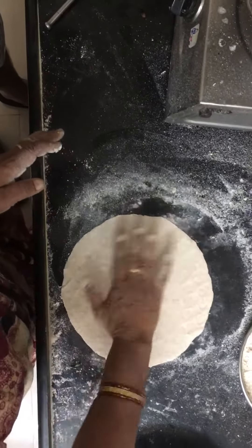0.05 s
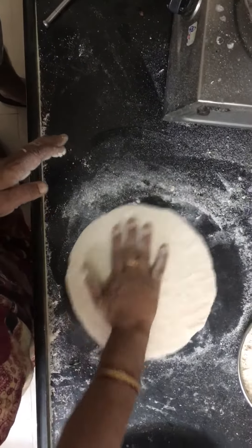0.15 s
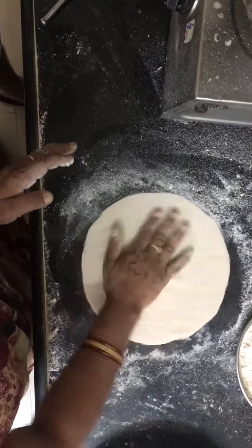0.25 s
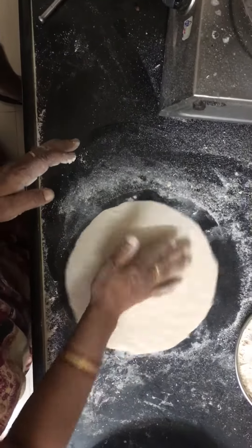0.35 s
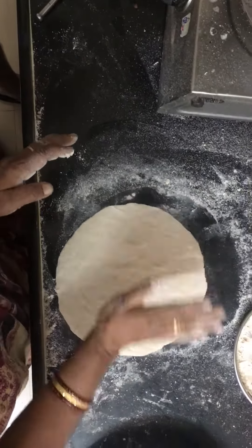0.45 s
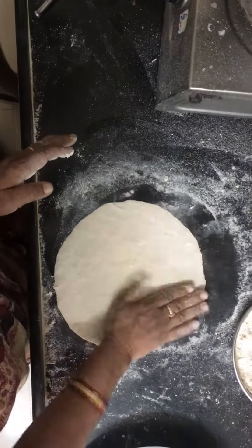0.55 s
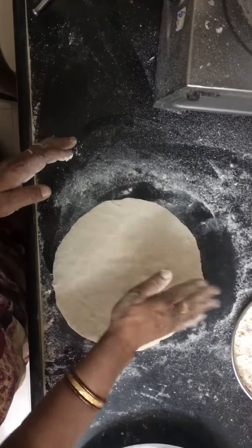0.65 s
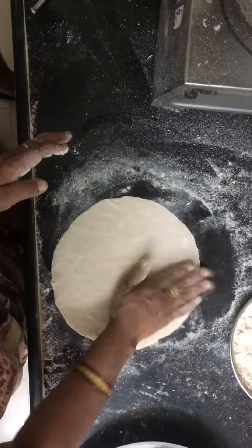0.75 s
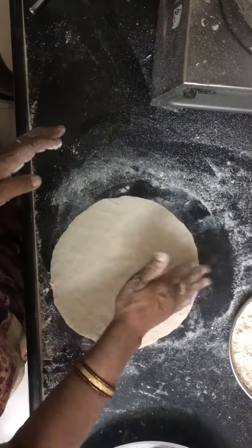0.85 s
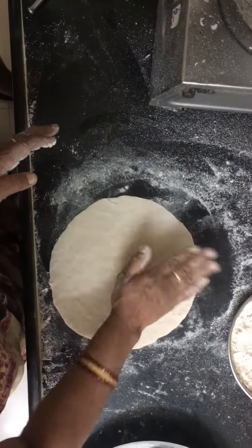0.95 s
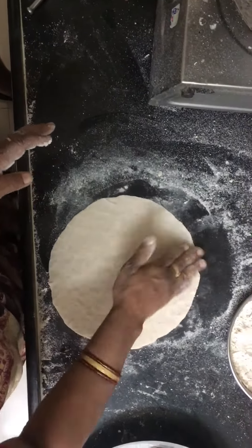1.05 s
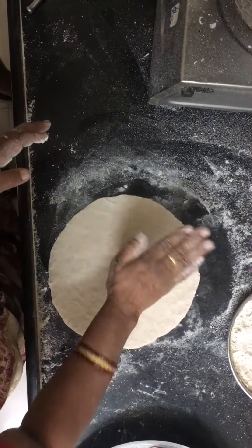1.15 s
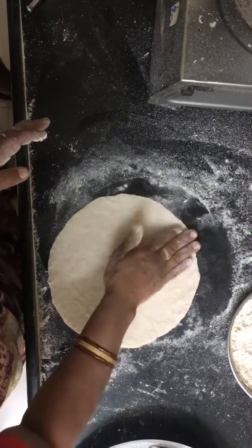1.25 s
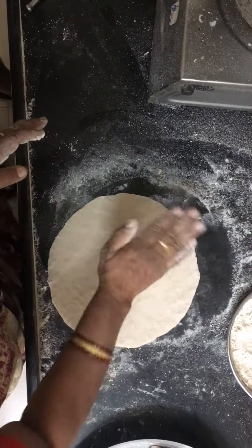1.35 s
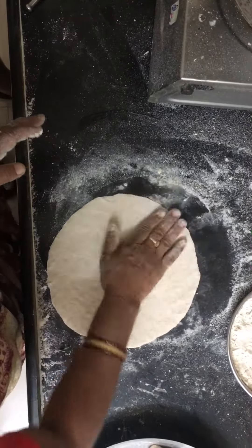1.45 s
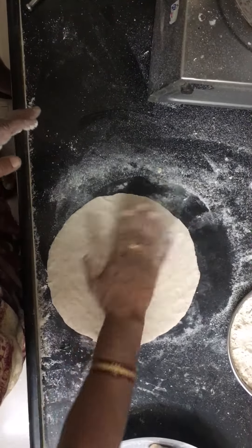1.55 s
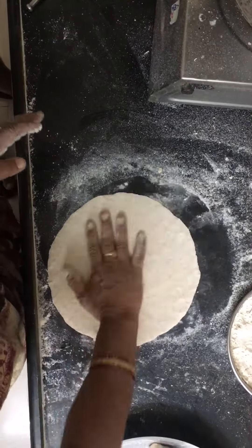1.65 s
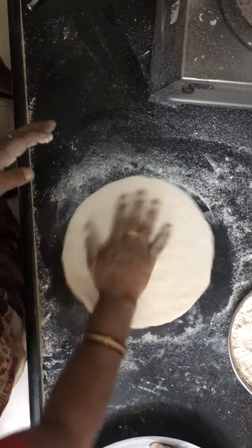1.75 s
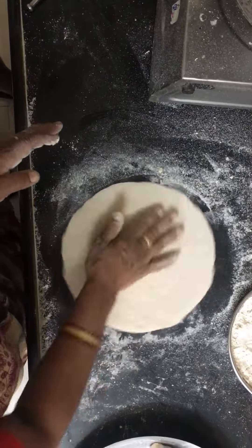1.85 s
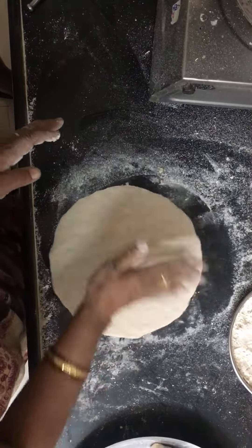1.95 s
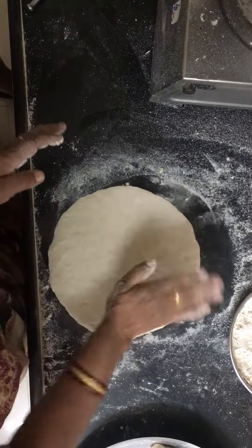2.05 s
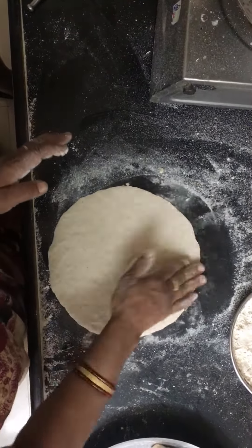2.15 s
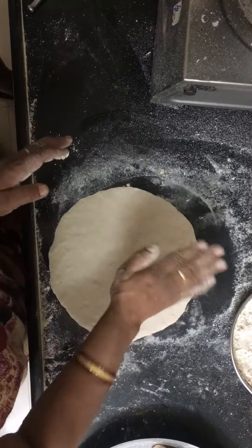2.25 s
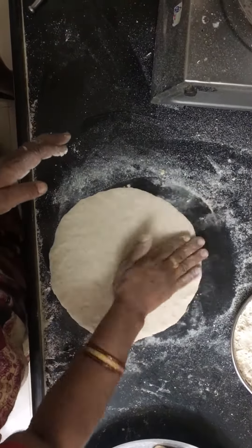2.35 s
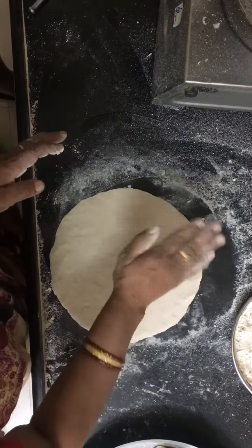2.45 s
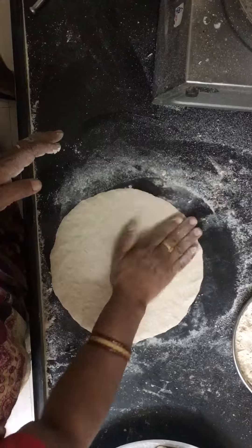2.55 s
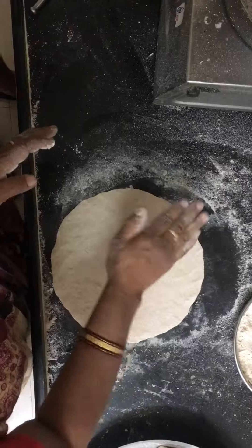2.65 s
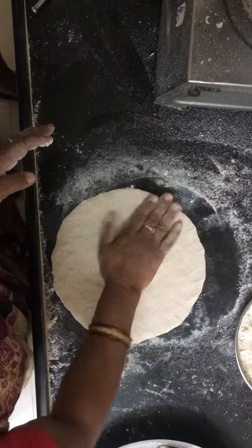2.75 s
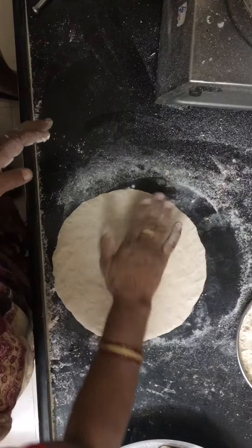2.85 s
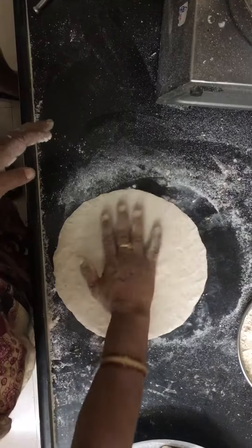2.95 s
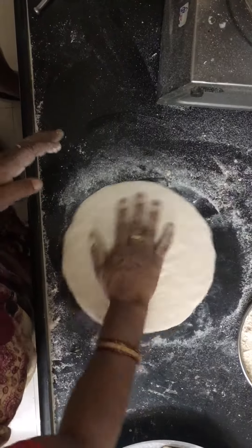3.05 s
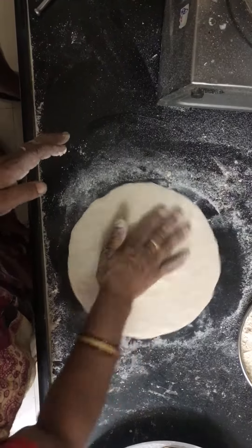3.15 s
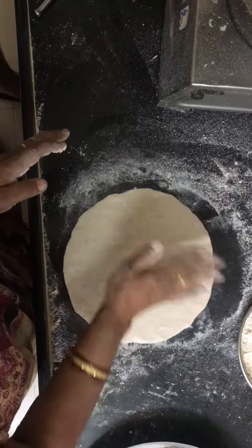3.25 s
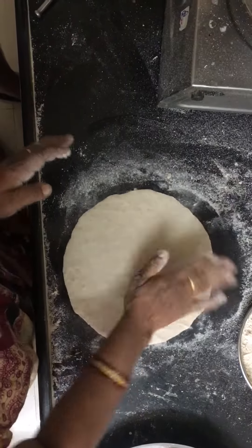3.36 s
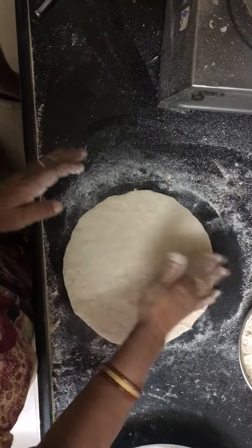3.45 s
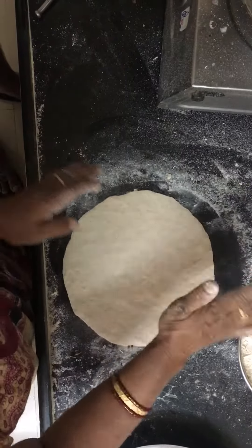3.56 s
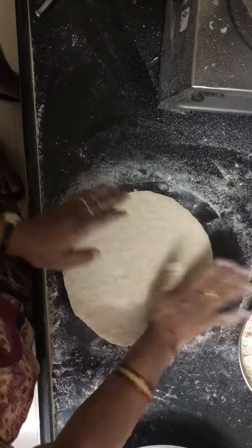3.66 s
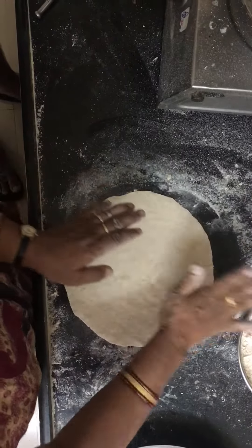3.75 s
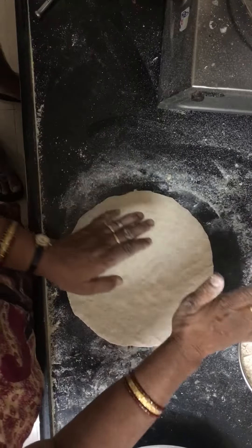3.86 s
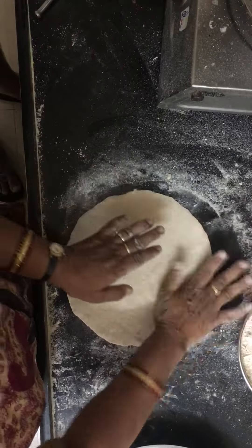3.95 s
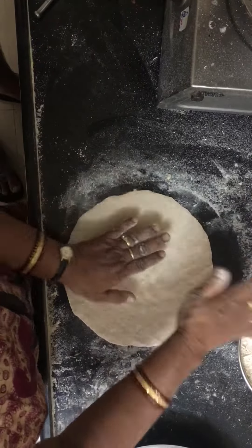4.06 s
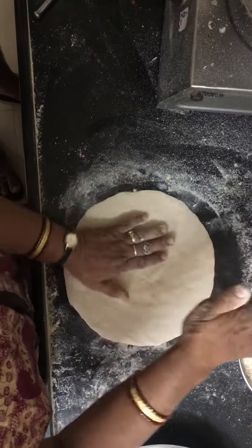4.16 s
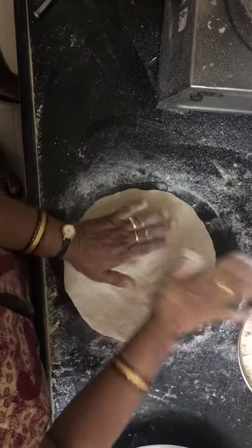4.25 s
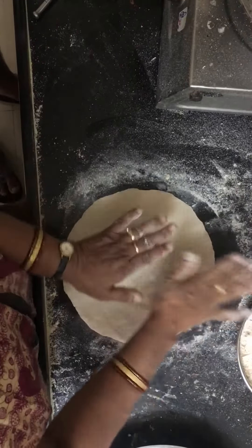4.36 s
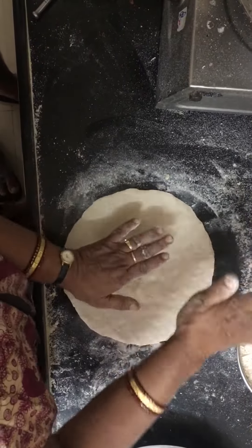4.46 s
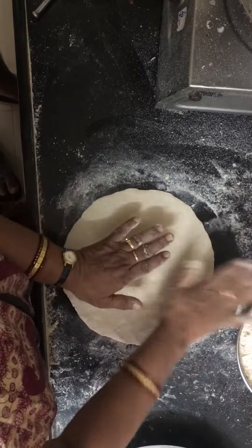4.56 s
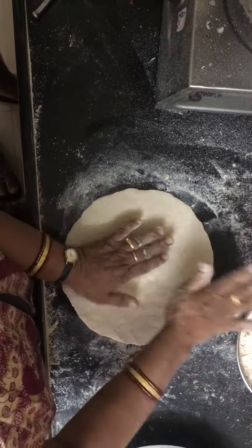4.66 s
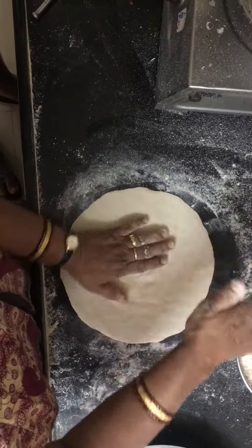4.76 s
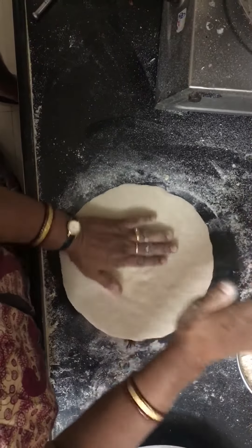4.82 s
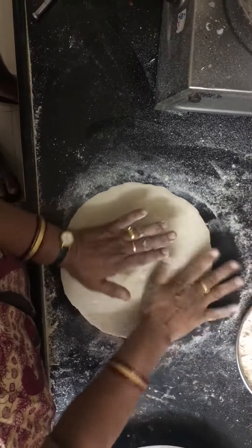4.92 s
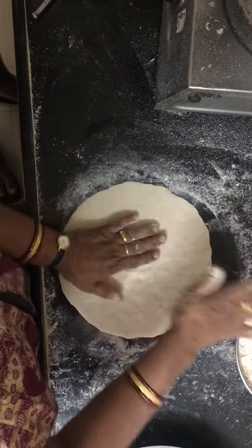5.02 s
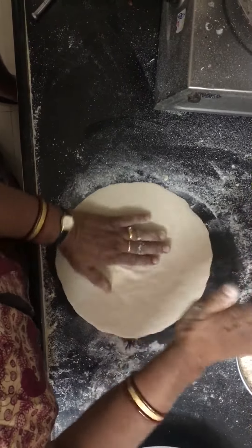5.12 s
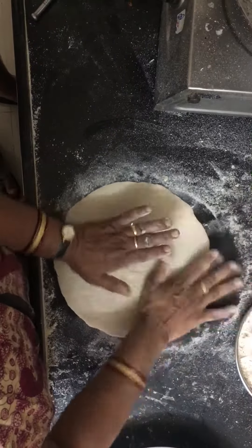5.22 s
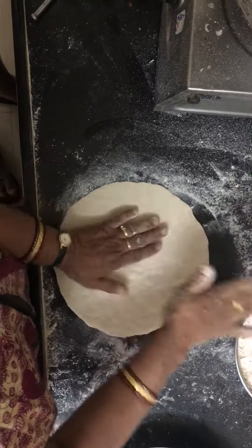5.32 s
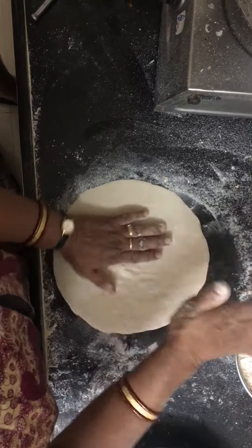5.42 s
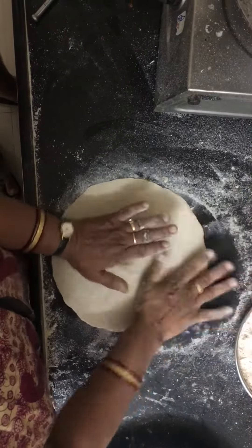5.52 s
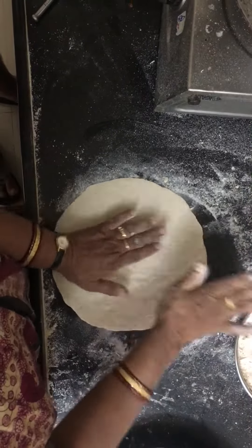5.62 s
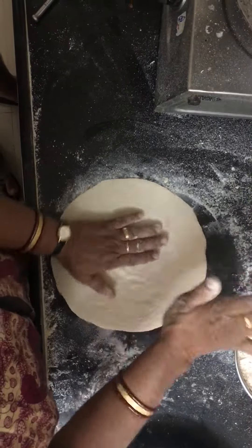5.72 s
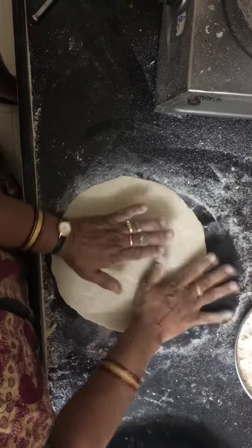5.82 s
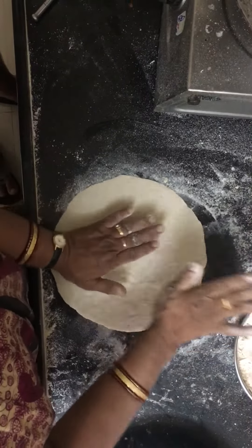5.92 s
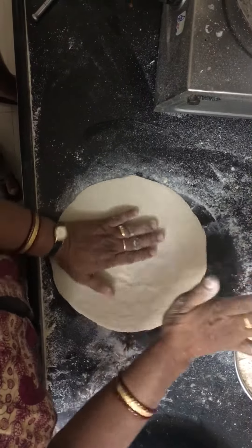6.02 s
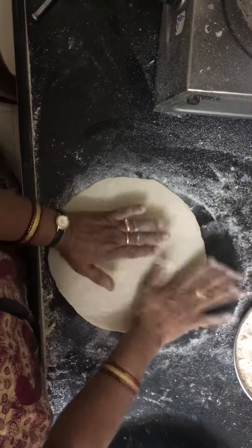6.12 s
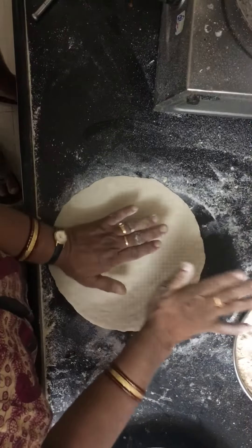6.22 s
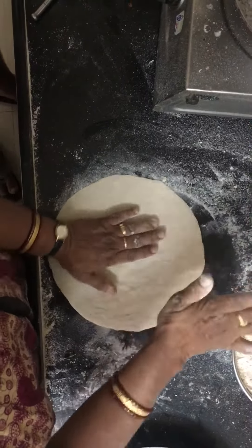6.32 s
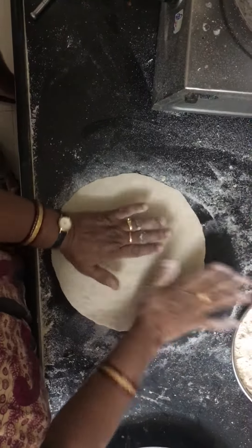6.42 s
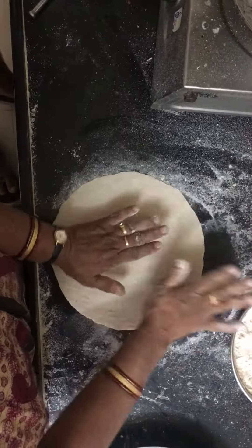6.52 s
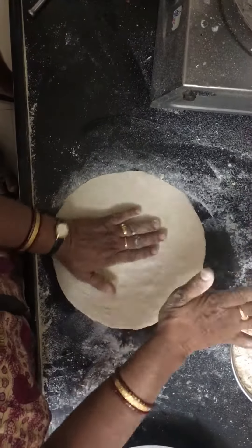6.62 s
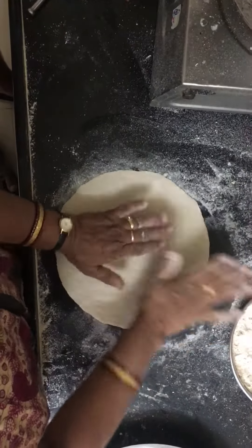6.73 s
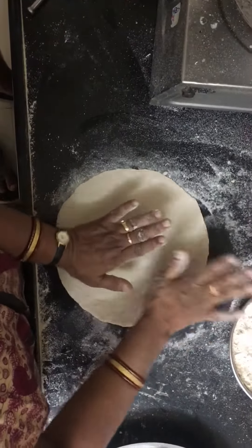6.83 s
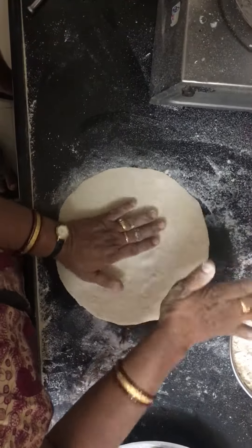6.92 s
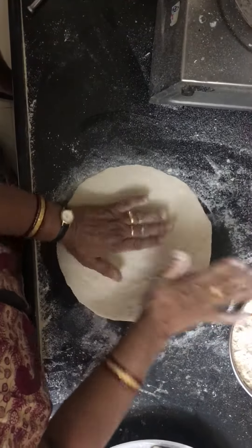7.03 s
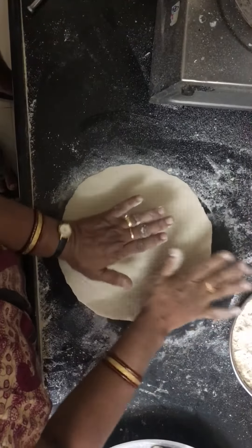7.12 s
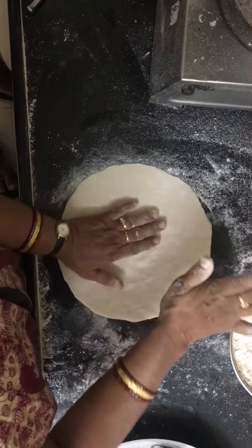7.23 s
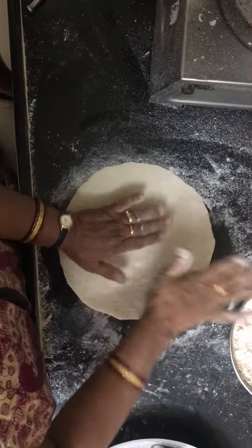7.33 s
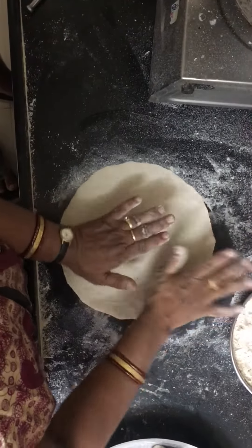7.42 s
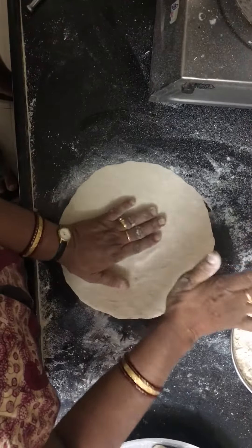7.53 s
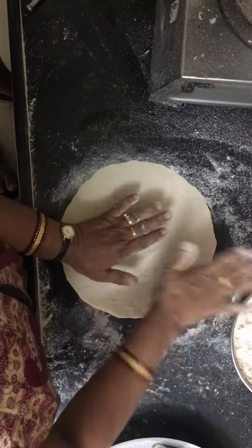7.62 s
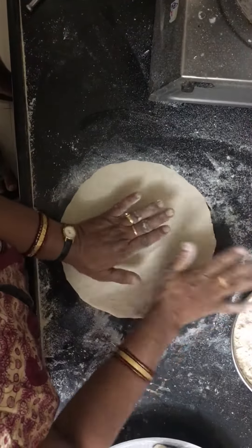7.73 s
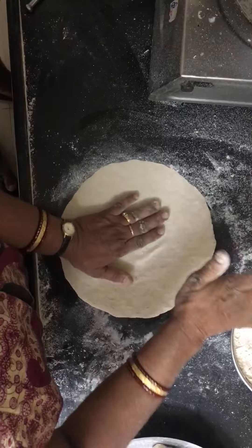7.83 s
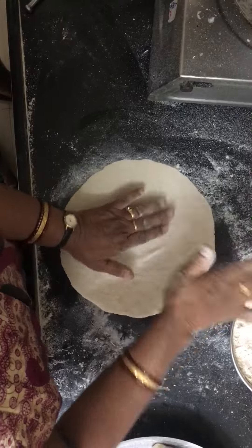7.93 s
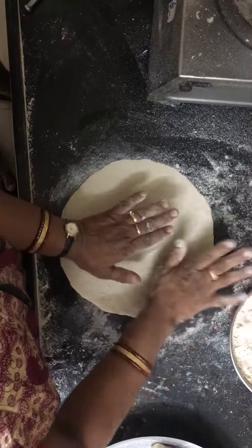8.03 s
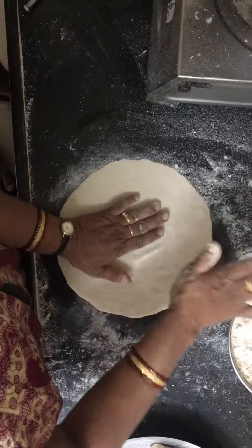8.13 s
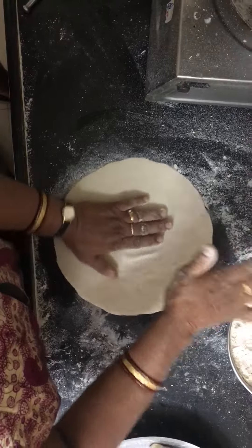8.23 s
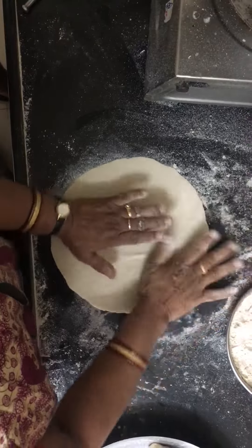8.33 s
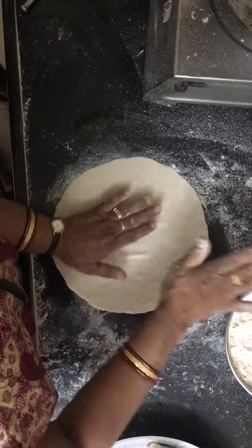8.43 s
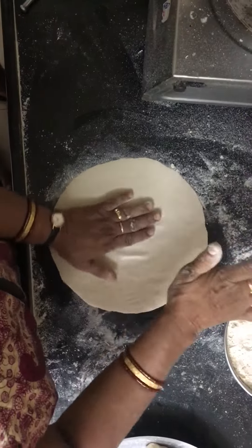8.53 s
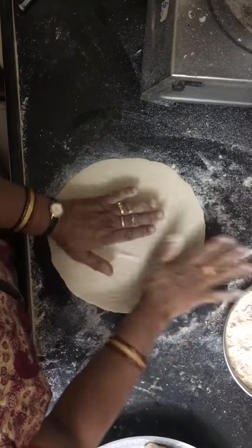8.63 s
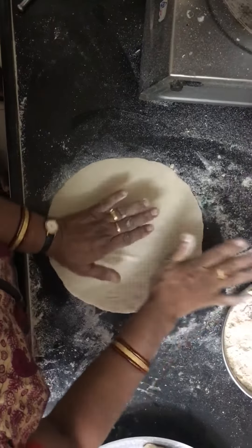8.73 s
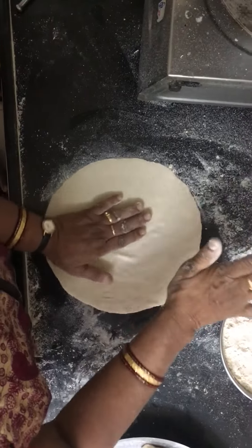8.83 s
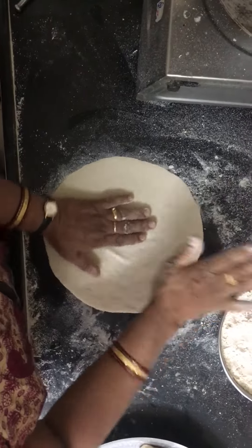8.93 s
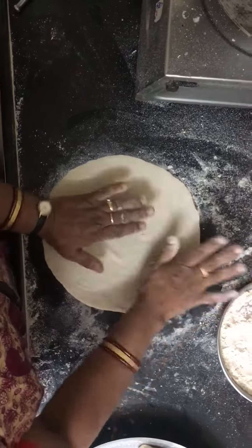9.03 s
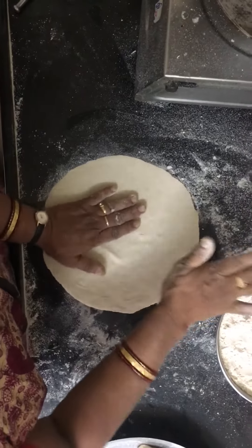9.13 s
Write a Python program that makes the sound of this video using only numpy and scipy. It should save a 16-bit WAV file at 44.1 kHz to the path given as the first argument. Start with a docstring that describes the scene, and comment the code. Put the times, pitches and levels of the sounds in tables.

```python
"""A hand slaps a round of dough flat on a floured stone counter in a small hard kitchen.
Each slap is a grainy splat coloured by trapped pockets of air, plus ringing modes of counter and room.
At first one hand pats and turns the dough, and flour hisses as shaped noise; then the other hand rests
on the dough and nudges it round after most slaps. Fingers click on the tacky surface.
A mains appliance hums behind it all as wavering sines over room noise."""
import sys
import numpy as np
from scipy import signal
from scipy.fft import rfft, irfft
from scipy.io import wavfile
from scipy.ndimage import uniform_filter1d

SR = 44100
rng = np.random.default_rng(int(sys.argv[2]) if len(sys.argv) > 2 else 0)


def store_pcm(level_fs):
    """Save levels as 16-bit WAV."""
    pcm = np.round(np.clip(level_fs, -1, 1) * 32767).astype(np.int16)
    wavfile.write(sys.argv[1], SR, np.atleast_2d(pcm).T)


N = 404838

# Hum lines of the appliance. Each row: pitch in Hz, middle level in dB rms.
HUM = [(50, -54), (100, -49), (260, -59), (350, -58), (598, -62)]
# Colour of the room noise. Each row: frequency in Hz, relative density in dB.
ROOM_NOISE = [(20, -41), (45, -7), (70, -1), (125, 8), (150, -5.5), (180, -10.5), (320, -13), (480, -17),
              (800, -14.5), (1500, -19.5), (2500, -24.5), (5000, -36), (9000, -45.5), (16000, -53.5)]

# Turns of the dough by one hand. Each row: start in s, length before it stops in s, relative hiss in dB.
TURNS = [(0.162, 0.26, -38.5), (1.709, 0.24, -38), (3.041, 0.19, -39.5)]
# Colour of freely sliding flour. Each row: frequency in Hz, relative level in dB.
FLOUR = [(400, -15), (1200, 3), (2100, 10.5), (3200, 5), (5000, 1), (7000, -1.5), (9300, -3), (10400, -5.5),
         (12500, -2.5), (16000, -10)]
# Hiss while the resting hand presses the dough down. Each row: frequency in Hz, relative level in dB.
PRESSED_FLOUR = [(400, -8), (1200, -4), (2100, 8.5), (3200, 4.5), (5000, -0.5), (7000, -1.5), (9300, -0.5),
                 (10400, -5.5), (12500, -3), (16000, -13)]
# Slaps that no nudge follows. Each entry: row of SLAPS, counted from 0.
UNNUDGED = [11, 13, 23]
# Fingers gripping the dough for a turn or peeling off it.
# Each row: start in s, relative body level in dB, relative treble level in dB.
TOUCHES = [(0.1648, -17.5, -37), (1.713, -18, -41), (3.0408, -24, -43), (6.937, -22, -36.5),
           (7.248, -29, -41), (7.5563, -23, -36.5), (8.16, -28, -41.5), (8.5145, -29, -46)]

# Reverberation of the kitchen. Each row: frequency in Hz, t60 in s.
KITCHEN = [(200, 0.27), (700, 0.42), (1800, 0.45), (3200, 0.35), (5000, 0.36), (8000, 0.27), (13000, 0.22)]
# Standing waves that stand out of the reverberation. Each row: pitch in Hz, relative level in dB.
STANDING_WAVES = [(555, -45.5), (634, -47.5), (926, -48), (969, -55.5), (1116, -49), (1254, -48.5),
                  (1503, -59), (1621, -54), (1769, -50)]
# Reflections from the nearest surfaces. Each row: delay in s, gain as a factor.
ECHOES = [(.0014, 0.1), (.0025, 0.14), (.0036, .15), (.0078, 0.27)]
# Colour of the direct crack against its reverberation. Each row: frequency in Hz, relative level in dB.
CRACK = [(300, 3), (700, -5), (1500, 1), (3000, 1), (6000, 1.5), (14000, 0)]

# Deep modes of counter and kitchen. Each row: pitch in Hz, relative level in dB, nominal t60 in s, arrival in s.
BOOM = [(53.1, -28.5, 0.98, 0.0069), (89.4, -1.5, 0.72, 0.0013), (123, -11.5, 0.25, 0.01214),
        (145, -10, 0.15, 0.0128), (185.5, -24.5, 0.52, 0.0029), (207.4, -28.5, 0.5, 0.0037),
        (224.1, -18.5, 0.38, 0.0045), (255.6, -14, 0.1, 0.00394), (272.3, -30, 0.5, 0.0052)]
# Higher modes of the counter top. Each row: pitch in Hz, relative level in dB, t60 in s, arrival in s.
KNOCK = [(301.5, -3.5, 0.37, 0.0055), (319.8, 1, 0.26, 0.00567), (345, 4.5, 0.098, 0.0046),
         (351.3, 5, 0.13, 0.00368), (435.5, -5.5, 0.28, 0.00298)]
# Colour that all slaps share. Each row: frequency in Hz, relative level in dB.
SKIN = [(60, -34), (250, 11), (420, 8), (620, 16.5), (900, 17), (1080, 14), (1500, 12.5), (2050, 11.5),
        (2600, 8.5), (3800, 5), (5000, -1), (7000, -1), (9300, -2.5), (10400, -9.5), (12000, -6),
        (15000, -14)]
# The slaps. Each row: palm landing in s (negative: before the start), relative thud in dB, strength of
# the smack in dB, cupping of the hand in dB, air under the palm in Hz, its lift in dB, air between the
# fingers in Hz, its lift in dB.
SLAPS = [(-0.056, -25.5, -6, 3.5, 1380, 9, 3100, 11), (0.6133, -21.5, 1, -6.5, 1450, 6.5, 3460, 7.5),
         (0.8277, -21, -1.5, -1.5, 1740, 1.5, 3100, 5.5), (1.0474, -22.5, -0.5, -6, 1740, 8, 5820.0, 3),
         (1.2616, -23, -3.0, 1, 2150, 5.5, 4040, 2.5), (1.4822, -26.5, -3, -5.5, 2050, 5, 3650, 10),
         (2.1551, -21.5, 0.0, -8, 970, 11.5, 3850, 7), (2.3764, -22.0, 1.5, -2.5, 1340, 10.5, 3600, 1),
         (2.596, -22.5, -1, 0.5, 1700, 5, 3800.0, 5), (2.8164, -25, -3, -6.5, 1570.0, 10.5, 3600, 6.5),
         (3.4472, -20.5, 2.5, -5, 2200, 5, 3770, 3), (3.7362, -15, -0.5, 5, 1250, 6.5, 5100, 10.5),
         (4.009, -16.0, 1.5, 6.5, 1410, 4, 2580.0, 8), (4.36, -14.5, -0.5, 8.5, 2110, 4.5, 4600, 6.5),
         (4.6423, -13.5, 6.5, 2.5, 2640, 8, 6250.0, 6.5), (4.9797, -14.5, 5, 3, 2540, 4.5, 3970, 2),
         (5.2869, -13.5, 3.5, 2, 1150, 5, 4160, 6), (5.5838, -11.5, 4.5, -2.5, 1570.0, 3, 2930, 7.5),
         (5.8865, -15.5, 1, -4.0, 2400, 9, 6000, 7.5), (6.1965, -13.5, 4.5, -0.5, 1390, 6.5, 3050, 5.5),
         (6.5084, -14, -0.5, -5.5, 2720, 8.5, 4140, 11),
         (6.8157, -10.5, 0.5, -4.5, 2420.0, 10.5, 4230.0, 4.5),
         (7.1276, -14, 0.5, -0.5, 2220, 1.5, 2870.0, 8),
         (7.4287, -13.0, -0.5, -4.5, 2020.0, -1.5, 3450, 7.5), (7.7219, -12.5, 2, 6, 1610, 4.5, 2300, 3),
         (8.0547, -14.5, -1.5, 1, 1880, 4.5, 4600, 7), (8.3766, -17, 1, 6.5, 1440, 4.0, 5640, 5.5),
         (8.7082, -17.5, 1.5, -2.0, 1640, 8, 3880, 5.0), (9.05, -18.0, 0.0, -5.0, 3030, 11.5, 5000, 11.5)]

SIZE = 4096  # samples in one contact
FREQS = np.fft.rfftfreq(SIZE, 1 / SR)
EDGE_HZ = 16100  # upper band limit
LEAD_S = .003  # fingertips touch this long before the palm
BOTH_HANDS_S = 3.6  # from here on the second hand rests on the dough
# A turn picks up speed, slows gradually, then stops.
TURN_ATTACK_S, TURN_SAG_DB_PER_S, TURN_STOP_DB_PER_S = 0.067, 43, 190.0
# A nudge is centred at this share of the way to the next slap; its length includes both fades.
NUDGE_PHASE, NUDGE_DB, NUDGE_LENGTH_S, NUDGE_FADE_S = 0.66, -51, 0.19, 0.071
# The hollow of a cupped hand resonates here, this broadly (share of its pitch).
CUP_HZ, CUP_WIDTH = 737, 1.12


def amp(db):
    """Decibels to gain."""
    return 10 ** (np.asarray(db) / 20)


def unit(x):
    """Scales to rms 1."""
    return x / np.sqrt(np.mean(x ** 2) + 1e-20)


def read(points, hz):
    """Reads a table of (Hz, value) on a log-frequency axis."""
    f, value = np.transpose(points)
    return np.interp(np.log(hz + 1), np.log(f + 1), value)


def add(mix, s, sound):
    """Mixes a sound in at time s, cutting what falls outside."""
    start = round(s * SR)
    sound = sound[max(-start, 0):]
    part = mix[max(start, 0):][:len(sound)]
    part += sound[:len(part)]


def noise(spectrum):
    """Steady noise of a given colour, rms 1."""
    white = rfft(rng.standard_normal(N))
    gain = amp(read(spectrum, np.fft.rfftfreq(N, 1 / SR)))
    return unit(irfft(white * gain, N))


def drift(rate_hz):
    """Random wandering, rms 1, up to about the given rate."""
    white = rfft(rng.standard_normal(N))
    slow = np.exp(-(np.fft.rfftfreq(N, 1 / SR) / rate_hz) ** 2)
    return unit(irfft(white * slow, N))


def causal(db):
    """Minimum-phase frequency response with the given gains."""
    log_gain = np.log(amp(np.r_[db, db[-2:0:-1]]))
    return np.exp(np.conj(signal.hilbert(log_gain)))[:len(db)]


def bump(centre_hz, width):
    """Shape of a resonance, top 1; width is a share of its pitch."""
    return 1 / (1 + ((FREQS - centre_hz) / (width * centre_hz / 2)) ** 2)


def background(air_db=-39.5, waver_db=3.0, wander_rad=0.61):
    """Hum lines wavering in level and phase over the low rumble and hiss of the room."""
    t = np.arange(N) / SR
    hum = np.zeros(N)
    for hz, db in HUM:
        level = amp(db + waver_db * drift(rate_hz=1.5))
        hum += level * np.sin(2 * np.pi * hz * t + wander_rad * drift(rate_hz=2.3))
    return np.sqrt(2) * hum + amp(air_db) * noise(ROOM_NOISE)  # root 2 turns rms into peak


def turns(turn_db):
    """Loudness of the hiss as one hand turns the dough: a run-up, a gradual sag, then a stop."""
    t, level = np.arange(N) / SR, np.zeros(N)
    for s, length, db in TURNS:
        age = np.maximum(t - s, 0)
        sag_db = TURN_SAG_DB_PER_S * np.maximum(age - TURN_ATTACK_S, 0)
        stop_db = TURN_STOP_DB_PER_S * np.maximum(age - length, 0)
        level += np.minimum(age / TURN_ATTACK_S, 1) * amp(db + turn_db - sag_db - stop_db)
    return level


def nudges():
    """Loudness of the hiss as the resting hand nudges the dough round between slaps."""
    t, level = np.arange(N) / SR, np.zeros(N)
    beats = [row[0] for row in SLAPS]
    for k, (s, next_s) in enumerate(zip(beats, beats[1:])):
        if s > BOTH_HANDS_S and k not in UNNUDGED:
            middle = s + NUDGE_PHASE * (next_s - s)
            to_edge = NUDGE_LENGTH_S / 2 - abs(t - middle)
            level += amp(NUDGE_DB) * np.clip(to_edge / NUDGE_FADE_S, 0, 1)
    return level


def sliding(turn_db=-1.5, judder_db=0.65, grit_db=0.2):
    """Dough dragged over loose flour hisses, catching slightly and grating on single grains."""
    hiss = turns(turn_db) * noise(FLOUR) + nudges() * noise(PRESSED_FLOUR)
    judder = judder_db * drift(rate_hz=42)
    grit = grit_db * drift(rate_hz=1400)
    return hiss * amp(judder + grit)


def contact(decay_s, graze_db, grain):
    """Spectrum of skin meeting dough: fingertips graze, the palm lands in a dying splat, near surfaces echo."""
    t = np.arange(SIZE) / SR - LEAD_S
    graze = np.where(t < 0, amp(graze_db) * (1 + t / LEAD_S), 1)
    splat = rng.standard_normal(SIZE) * np.exp(-np.maximum(t, 0) / decay_s) * graze
    landing = np.exp(-2j * np.pi * FREQS * LEAD_S)
    z = grain * rfft(splat) / np.linalg.norm(splat) + landing
    z = z / np.sqrt(uniform_filter1d(abs(z) ** 2, size=90))  # flat overall, only the fine grain is left
    return z * (1 + sum(gain * np.exp(-2j * np.pi * FREQS * delay) for delay, gain in ECHOES))


def tail(onset_s=0.00064, swell_s=0.00047, standing_t60=0.28):
    """Diffuse kitchen reflections of energy 1, each band dying at its own speed, with a few standing waves."""
    t = np.arange(SR * 2 // 3) / SR
    hz, frame_s, z = signal.stft(rng.standard_normal(len(t)), SR, nperseg=256)
    decay = amp(-60 * frame_s / read(KITCHEN, hz)[:, None])
    ring = signal.istft(z * decay, SR, nperseg=256)[1][:len(t)]
    ring = ring / np.linalg.norm(ring)
    for wave_hz, db in STANDING_WAVES:
        wave = np.sin(2 * np.pi * (wave_hz * t + rng.random()))
        ring = ring + amp(db - 60 * t / standing_t60) * wave
    ring = ring * np.clip((t - onset_s) / swell_s, 0, 1)
    return ring / np.linalg.norm(ring)


def blow(colour_db, crack_db, spectrum, imprint=0.041):
    """One contact: the direct crack with its fine grain, then the room, which evens most of that grain out."""
    grain_db = 20 * np.log10(uniform_filter1d(abs(spectrum), size=12) + 1e-9)
    radiated = irfft(causal(colour_db + imprint * (grain_db - grain_db.mean())))
    crack = irfft(causal(colour_db + read(CRACK, FREQS)) * spectrum)
    crack = crack * np.linalg.norm(radiated) / np.linalg.norm(crack)  # crack_db is direct against room
    out = np.zeros(SR)
    add(out, 0, amp(crack_db) * crack)
    add(out, LEAD_S, signal.fftconvolve(radiated, tail()))
    return out


def touches(level_db=11.5, treble_db=14.0, ring_hz=1900, ring_db=8.0, direct_db=7.0):
    """Small tacky clicks of fingers on dough: grainy contacts with one narrow resonance."""
    out = np.zeros(N)
    for s, db, top_db in TOUCHES:
        body_db, fizz_db = db + level_db, top_db + treble_db
        curve = [(200, body_db - 10), (1200, body_db + 3), (2500, body_db - 3.5),
                 (7000, fizz_db), (16000, fizz_db - 13)]
        colour_db = read(curve, FREQS) + ring_db * bump(ring_hz, width=0.2)
        skin = contact(decay_s=0.0059, graze_db=-6, grain=9.6)
        add(out, s - LEAD_S, blow(colour_db, direct_db, skin))
    return out


def ringing(modes, rise_s):
    """A blow sets modes swinging; each starts at its arrival, builds up and dies away."""
    t, out = np.arange(SR) / SR, 0
    for hz, db, t60, arrival in modes:
        age = np.maximum(t - arrival, 0)
        envelope = amp(db - 60 * age / t60) * (1 - np.exp(-age / rise_s))
        out = out - envelope * np.sin(2 * np.pi * hz * age)
    return out


def thud(rise_s=0.01, low_hz=46, echo_s=.034, echo_db=-7.0, echo_length_s=0.011, decay_spread=3.5):
    """Deep boom of counter and room: its decay varies by slap, and the far wall returns its first swing."""
    t = np.arange(SR) / SR
    boom = ringing(BOOM, rise_s) * np.exp(-t * decay_spread * rng.uniform(-1, 1))
    first_swing = ringing(BOOM, rise_s / 10) * np.exp(-(t / echo_length_s) ** 2 / 2)
    add(boom, echo_s, amp(echo_db) * first_swing)
    return signal.sosfilt(signal.butter(2, low_hz, "high", fs=SR, output="sos"), boom)


def slap(crack_db, strength_db, cup_db, pockets, pocket_width=0.32):
    """A palm on dough, coloured by the pockets of air that it traps; a cupped hand pops deeper."""
    colour_db = strength_db + read(SKIN, FREQS) + cup_db * bump(CUP_HZ, CUP_WIDTH)
    for hz, lift_db in pockets:
        colour_db = colour_db + lift_db * bump(hz, pocket_width)
    return blow(colour_db, crack_db, contact(decay_s=0.0022, graze_db=-8.0, grain=1.87))


def patting(boom_db=3.5, knock_db=-29.0, knock_per_strength=0.43, knock_per_cup=0.33, held_knock_db=-3.5,
            crack_db=1.1, crack_per_strength=0.36, crack_per_cup=0.22, held_crack_db=3.5):
    """Slaps crack in the air and shake the counter; the resting hand damps the knock and tightens the crack."""
    out = np.zeros(N)
    knock = ringing(KNOCK, rise_s=0.00089)
    for s, thud_db, strength_db, cup_db, palm_hz, palm_db, finger_hz, finger_db in SLAPS:
        held = s > BOTH_HANDS_S
        # light, flat slaps crack the most against their own reverberation
        direct_db = crack_db - crack_per_strength * strength_db - crack_per_cup * cup_db
        direct_db += held * held_crack_db
        counter_db = knock_db + knock_per_strength * strength_db + knock_per_cup * cup_db
        counter_db += held * held_knock_db
        pockets = [(palm_hz, palm_db), (finger_hz, finger_db)]
        add(out, s - LEAD_S, slap(direct_db, strength_db, cup_db, pockets))
        add(out, s, amp(thud_db + boom_db) * thud())
        add(out, s, amp(counter_db) * knock)
    return out


def scene():
    """Hands, dough and kitchen at one microphone above the counter."""
    return (background() + sliding() + touches() + patting())[None]


def record(dry):
    """The sharpest peaks are rounded off at full scale; then the treble is band-limited."""
    rounded = dry / (1 + dry ** 6) ** (1 / 6)
    low_pass = signal.firwin(401, EDGE_HZ, window=("kaiser", 9), fs=SR)
    return signal.oaconvolve(rounded, low_pass[None], "same")


dry = scene()
out = record(dry)
store_pcm(out)
```